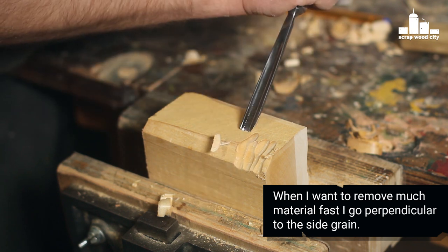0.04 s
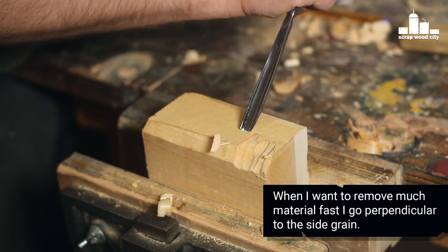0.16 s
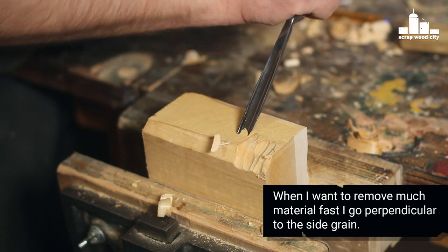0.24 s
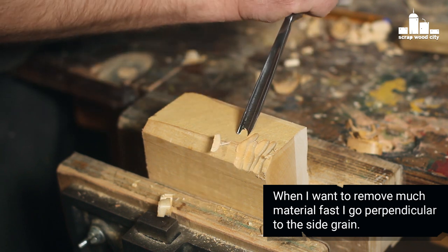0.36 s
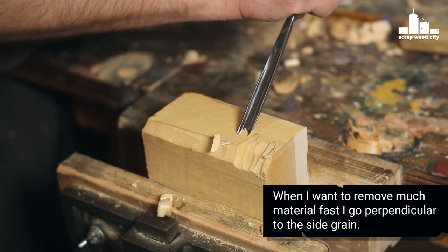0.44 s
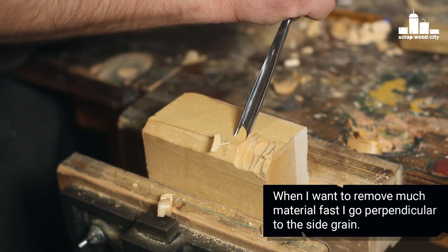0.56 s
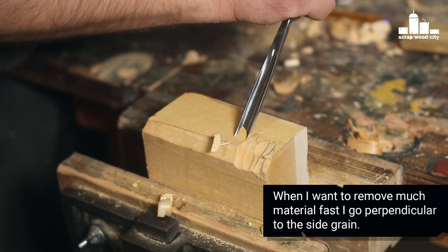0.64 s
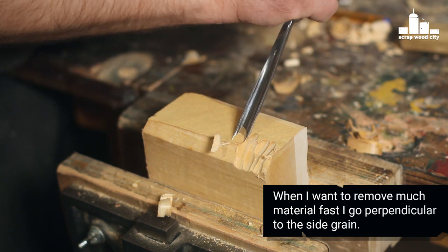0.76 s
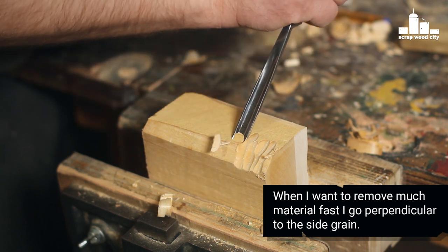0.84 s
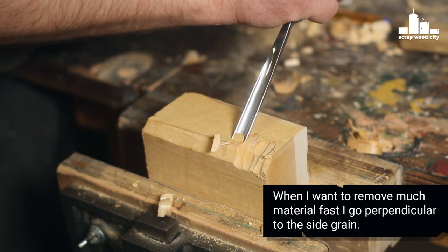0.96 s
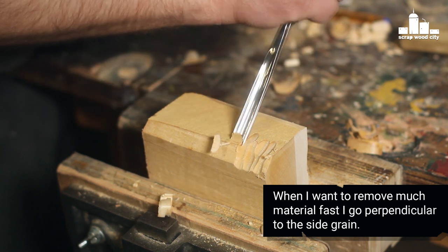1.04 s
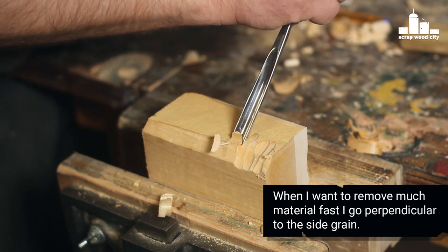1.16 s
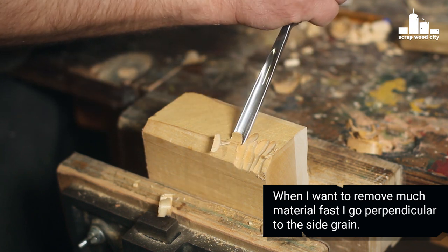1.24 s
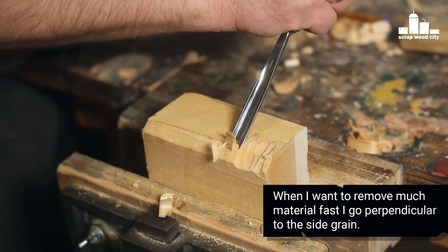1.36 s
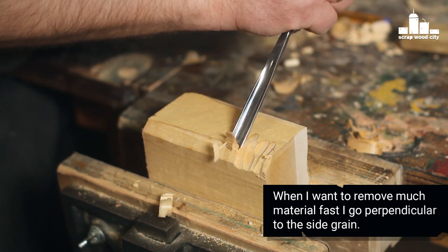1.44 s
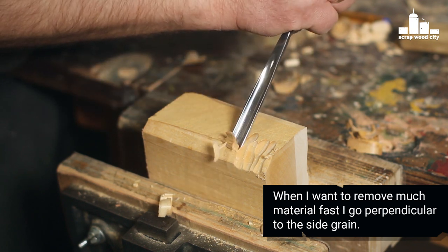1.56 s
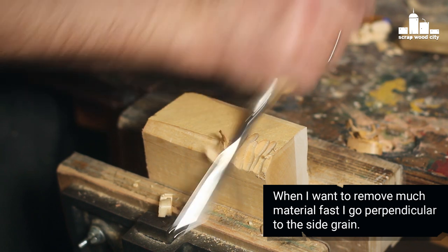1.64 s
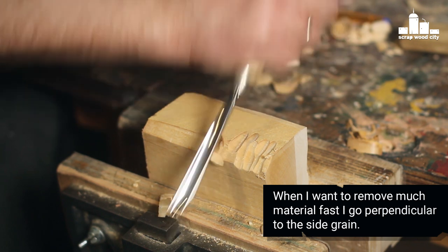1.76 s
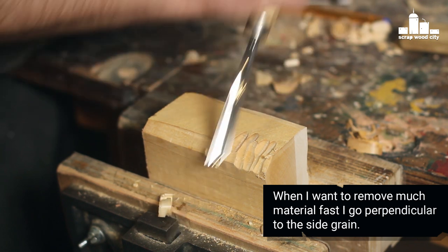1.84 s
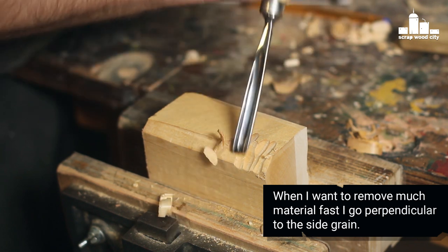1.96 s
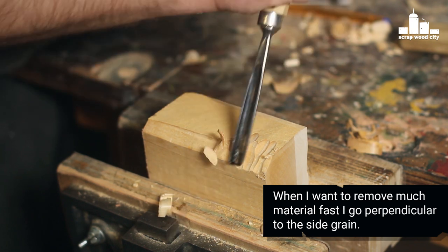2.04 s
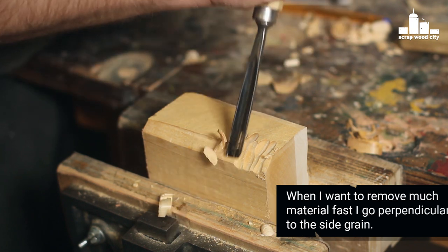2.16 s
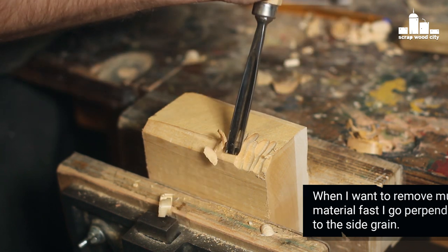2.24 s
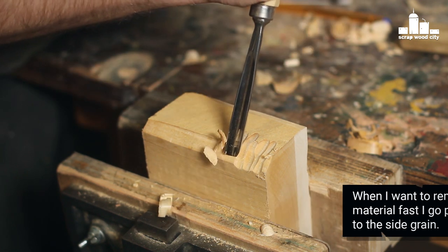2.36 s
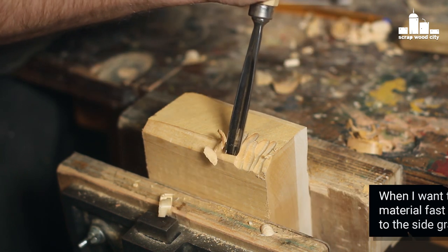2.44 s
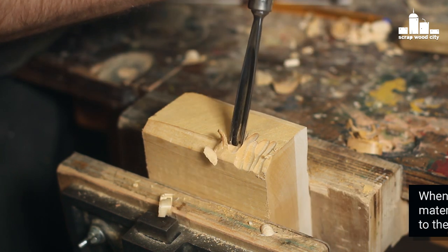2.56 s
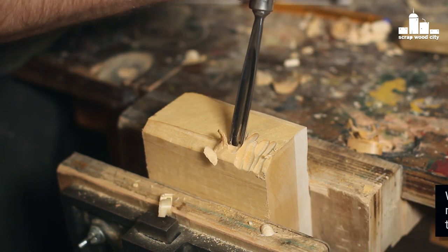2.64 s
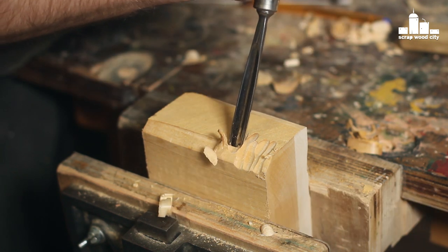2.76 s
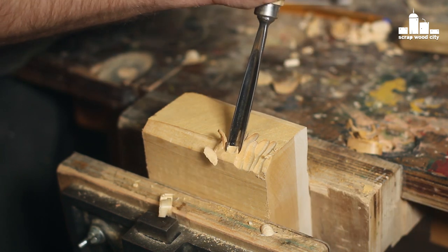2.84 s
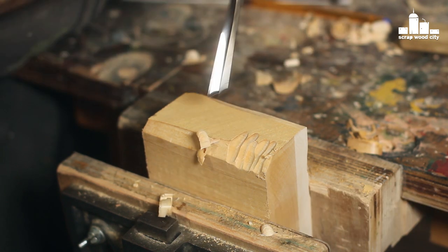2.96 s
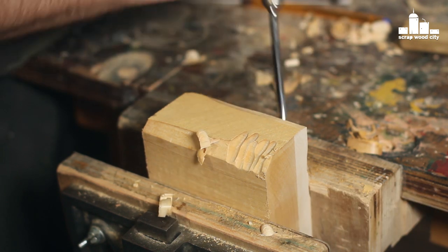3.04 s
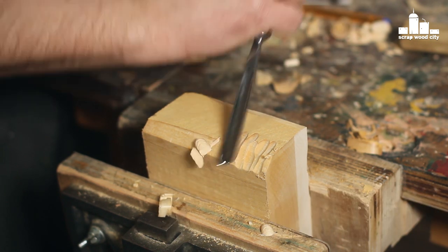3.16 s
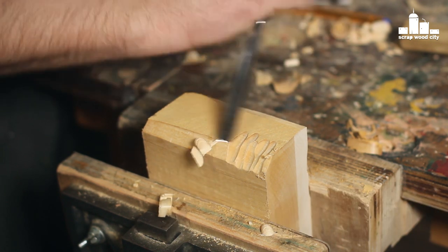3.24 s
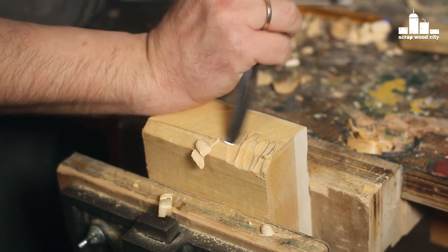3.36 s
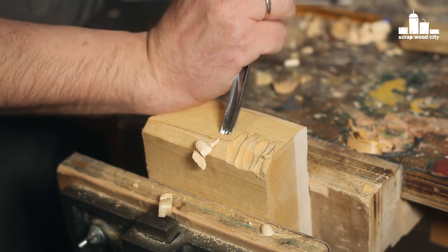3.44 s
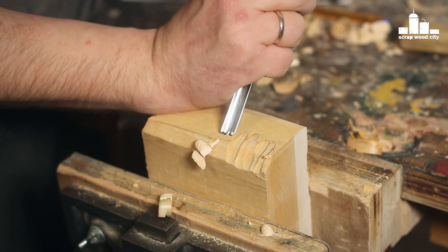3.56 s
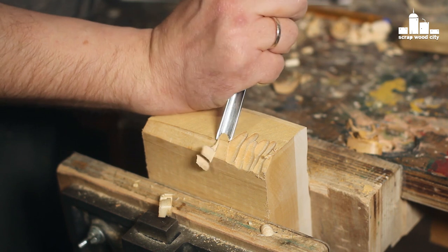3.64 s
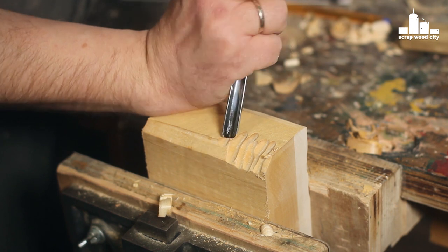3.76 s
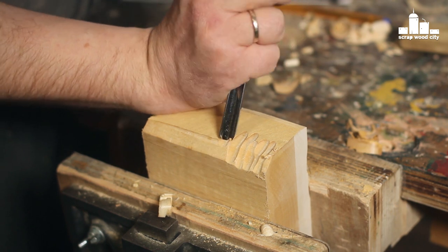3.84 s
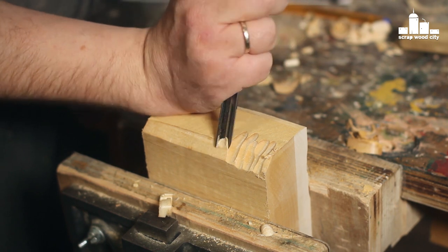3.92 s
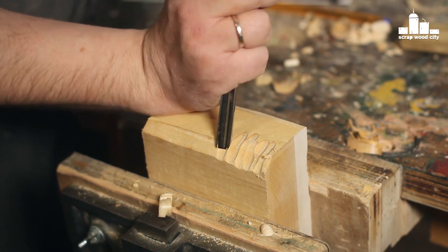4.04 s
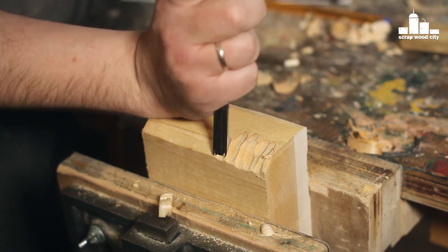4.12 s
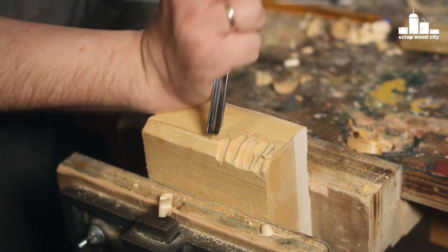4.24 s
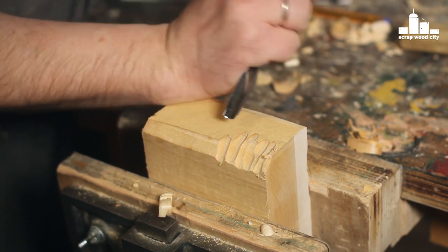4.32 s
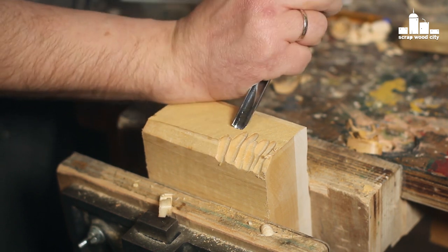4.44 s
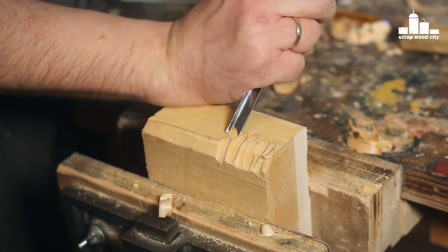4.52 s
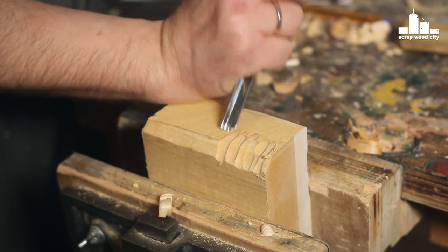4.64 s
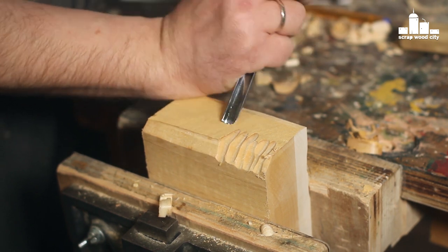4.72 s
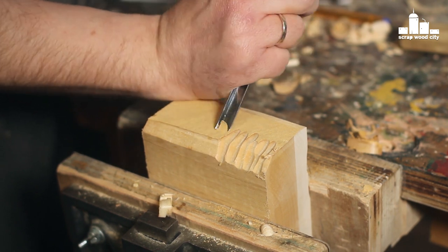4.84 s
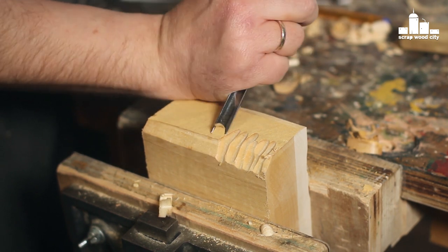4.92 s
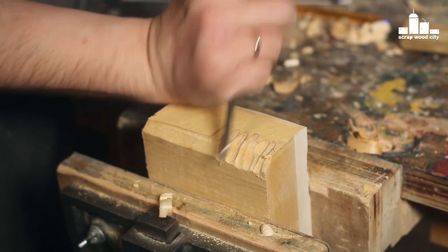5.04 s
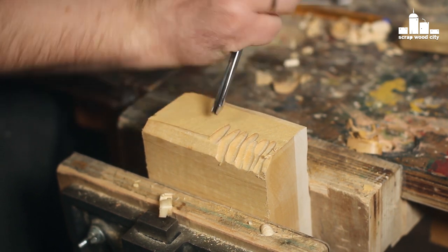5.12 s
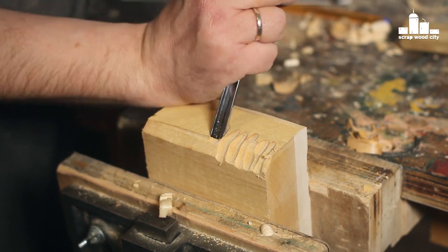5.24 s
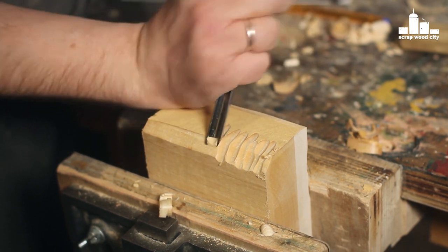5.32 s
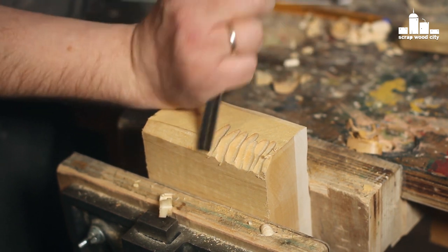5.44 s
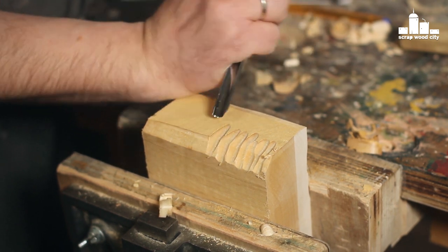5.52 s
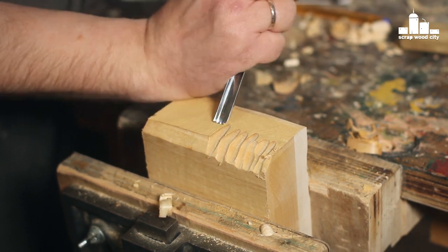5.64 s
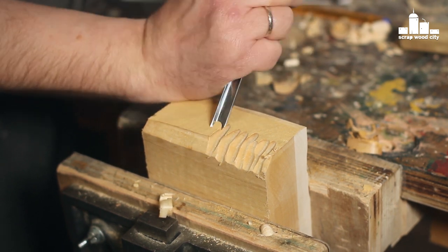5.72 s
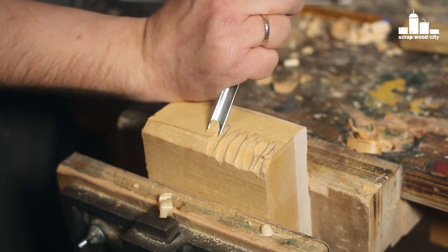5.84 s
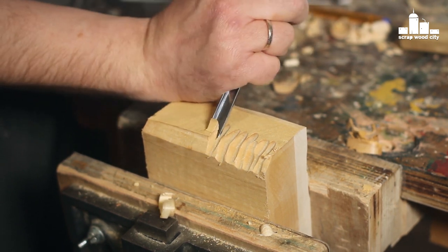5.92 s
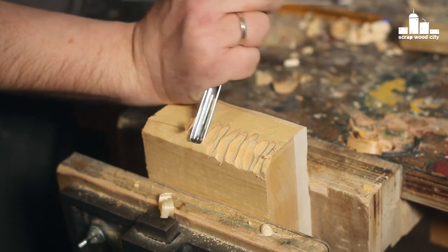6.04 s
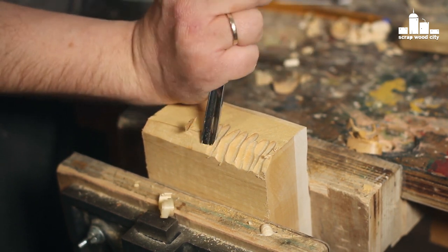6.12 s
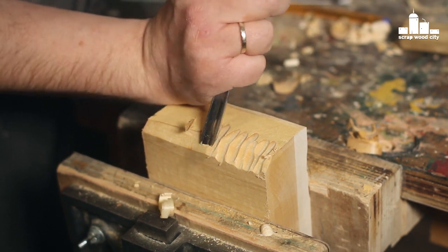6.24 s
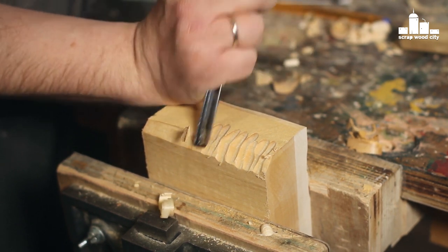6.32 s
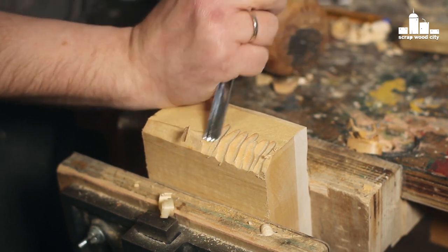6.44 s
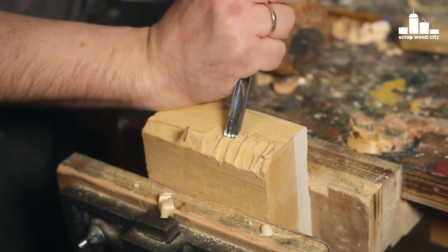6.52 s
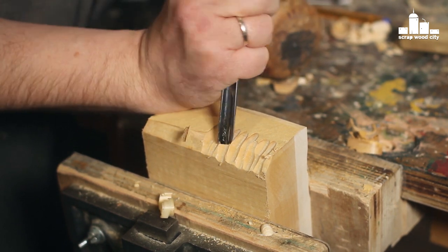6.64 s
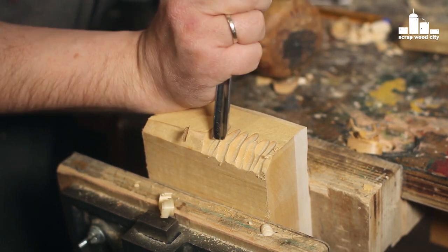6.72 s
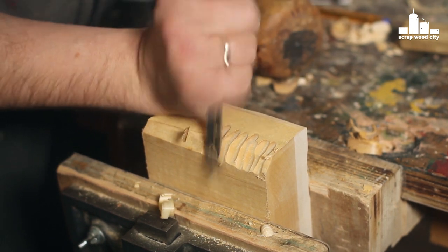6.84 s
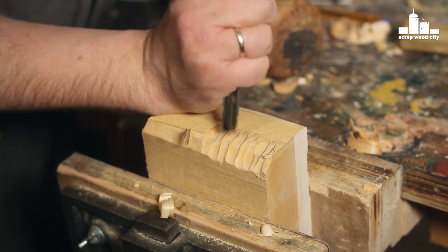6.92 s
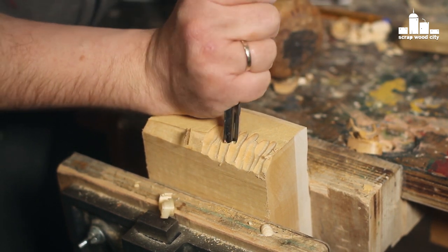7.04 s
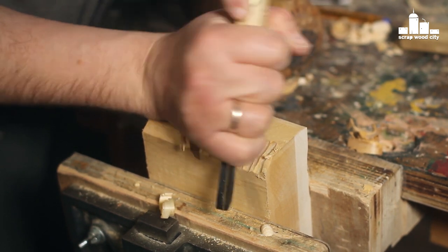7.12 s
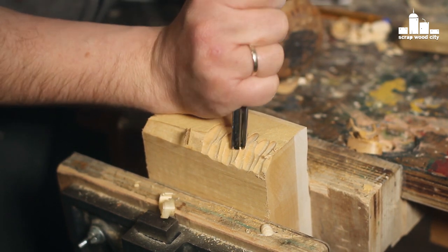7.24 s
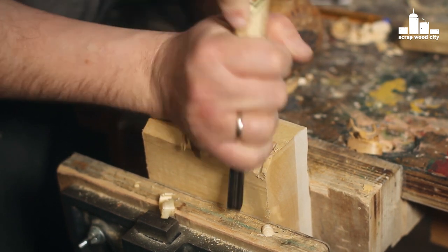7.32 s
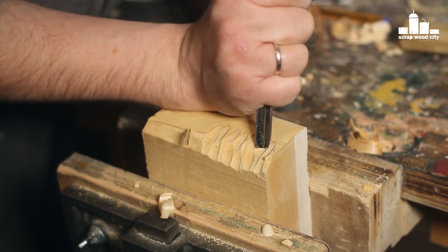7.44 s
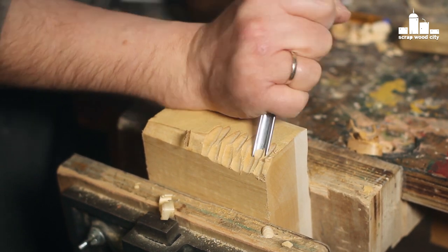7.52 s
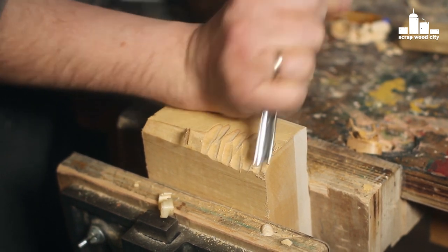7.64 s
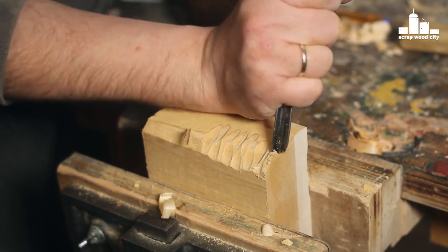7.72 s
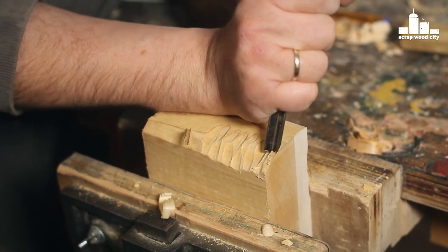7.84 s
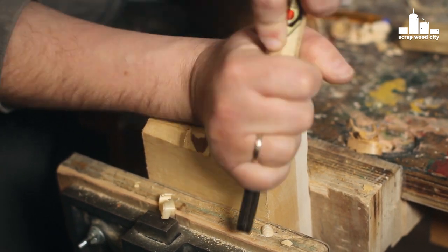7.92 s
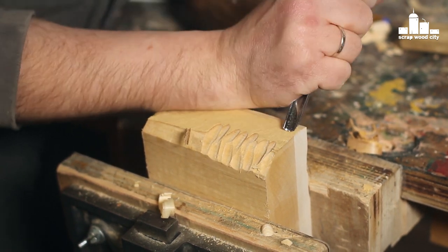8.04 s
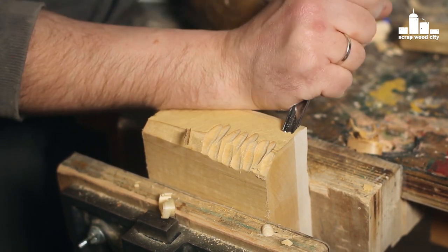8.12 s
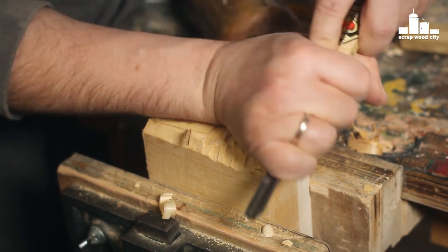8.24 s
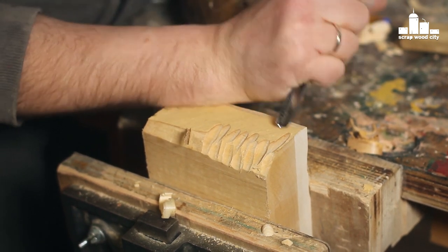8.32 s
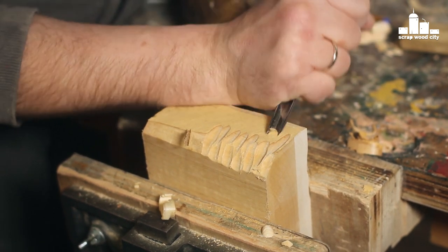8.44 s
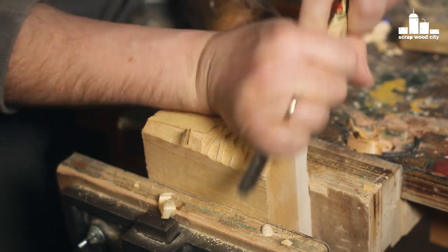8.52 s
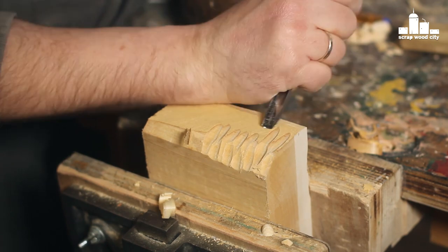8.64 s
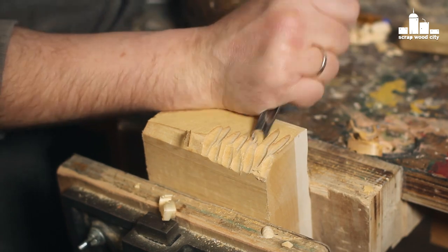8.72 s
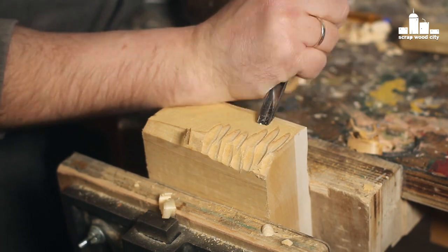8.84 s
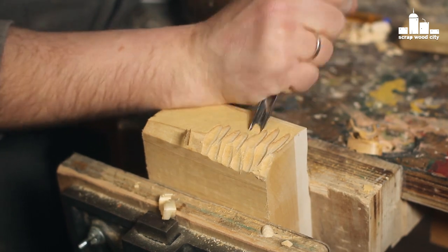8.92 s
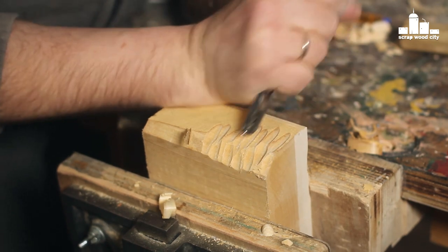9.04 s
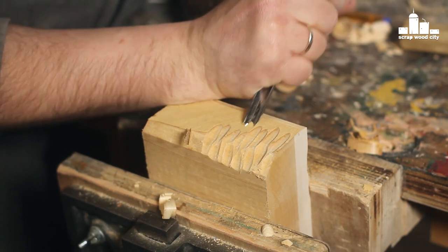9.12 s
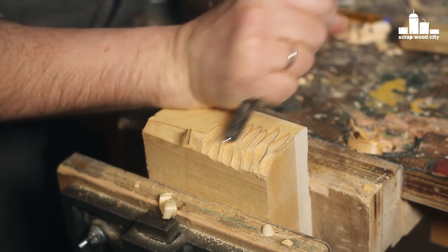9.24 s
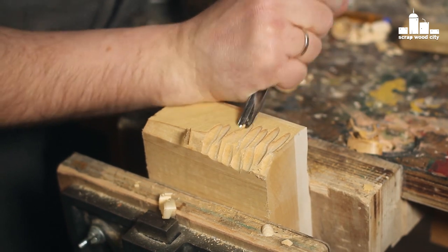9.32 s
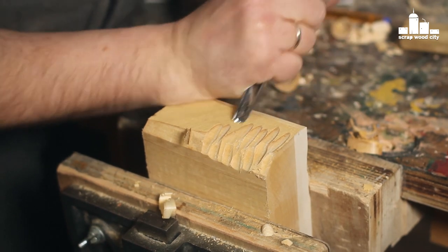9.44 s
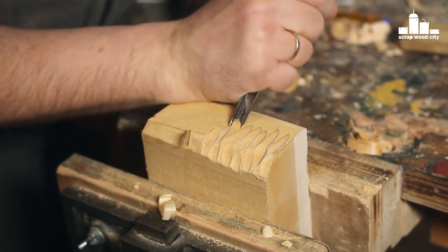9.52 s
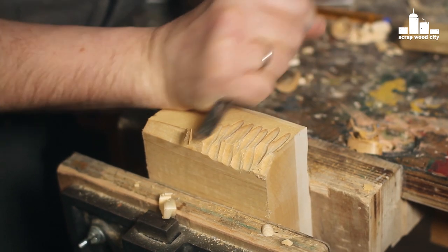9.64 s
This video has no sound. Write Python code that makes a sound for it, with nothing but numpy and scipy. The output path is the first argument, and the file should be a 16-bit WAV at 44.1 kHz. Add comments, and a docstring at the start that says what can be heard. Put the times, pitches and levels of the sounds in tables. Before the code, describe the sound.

Mallet blows knock a gouge into a clamped wood block, then speed up into higher, tighter taps before crunchy hand-pushed cuts with soft thumps.

```python
"""A gouge is driven into a clamped wood block on a bench in a small workshop, over quiet air and a wavering hum.
Mallet blows come first: each is a sharp touch and a rough slip that set bench, block and tool ringing.
A faint squeak of two steady tones comes near 2.5 s. From 2.79 s the work is played back faster, so blows,
bench, room and hum sound higher and ringing dies sooner. Tool bumps and chips are smaller, softer contacts.
From 6.6 s a low rumble joins, then cuts pushed by hand: dense fibre clicks, after which the hand lands."""
import sys
import numpy as np
from scipy import signal
from scipy.fft import rfft, irfft
from scipy.io import wavfile

SR = 44100
rng = np.random.default_rng(int(sys.argv[2]) if len(sys.argv) > 2 else 0)


def gain_from_db(level_db):
    """Convert decibel levels to linear amplitude factors (20 dB per decade)."""
    decades = np.asarray(level_db, float) / 20
    return 10 ** decades


def bounce(signal):
    """Save signal as a 16-bit WAV file at the path given by the first command-line argument."""
    frames = np.transpose(np.atleast_2d(signal))
    limited = np.clip(frames, -1, 1)
    pcm = np.round(limited * 32767).astype(np.int16)
    wavfile.write(sys.argv[1], SR, pcm)


N = 426447

FAST_FROM_S, SPEED = 2.79, 3.566   # from this moment, this many times faster

# spectrum of the quiet room air at normal speed: (frequency [Hz], relative level per Hz [dB])
AIR_SLOW = [(15, -30.5), (25, -14.5), (52, -4.5), (114, -19.5), (193, -6.5), (265, -21.5), (302, -16),
            (497, -22), (567, -17), (613, -17.5), (909, -22), (984, -24), (1060, -24.5), (2280, -26),
            (13200, -42.5)]
# spectrum of the air once sped up, as heard: (frequency [Hz], relative level per Hz [dB])
AIR_FAST = [(15, -41.5), (25, -23), (284, -8), (403, -17), (710, -4.5), (791, -13.5), (1090, -11.5),
            (1280, -14.5), (1680, -17), (1930, -17.5), (3390, -18.5), (4570, -22), (15800, -28)]
AIR_SLOW_DB, AIR_FAST_DB = -61.5, -61
# wavering hum at normal speed: (frequency [Hz], width [Hz], level [dB])
HUM = [(191.5, 1.6, -72), (202, 1.6, -74)]

# mallet on the handle:
# (time [s], force [dB], share reaching the wood [dB], blade brightness [dB], blade ring over force [dB])
BLOWS = [(0.298, -6.5, -18, 2, -1.5), (0.585, -6, -11, 5.5, -38), (0.856, -7, -8.5, 2.5, -40),
         (1.126, -9.5, -4, 6.5, -50), (1.402, -9, -3.5, 3.5, -49), (1.677, -6.5, -14, 2.5, -19),
         (2.872, -9, -14.5, 0.5, -22), (2.951, -8, -11.5, 3, -31), (3.682, -9.5, -14.5, 1.5, -33),
         (3.768, -8, -13.5, -3.5, -17), (3.968, -10, -13, 3.5, -38), (4.043, -9, -15.5, 1.5, -33),
         (4.249, -10, -17.5, 2, -36.5), (4.585, -9, -12.5, -1.5, -24), (4.657, -9, -11, -1, -35),
         (4.892, -7, -12, -1.5, -22), (4.966, -11, -4, 5.5, -36), (5.032, -11, -5, 1.5, -27),
         (5.102, -9.5, -15, -0.5, -25), (5.406, -10, -12, 2.5, -25), (5.479, -10.5, -13.5, 0, -21),
         (5.777, -11, -7.5, 2, -31), (5.843, -9, -8, 1, -28), (5.909, -13.5, -1.5, 3.5, -36.5),
         (5.971, -8.5, -7.5, -3.5, -31), (6.034, -10, -9, -3.5, -34), (6.337, -11, -14.5, 6, -35)]
# chips snap off and drop: (time [s], force [dB], share reaching the wood [dB])
CHIPS = [(2.0953, -55, -22), (3.2246, -42.5, -18), (3.2694, -39.5, -8), (3.3344, -48, -5), (3.5839, -53, 0),
         (3.908, -51.5, -1), (3.94, -48.5, 0), (4.18, -54, -1.5), (4.472, -50.5, 0), (6.6163, -50.5, 3),
         (6.989, -38.5, 3.5), (7.2325, -31.5, -6), (7.2627, -45, 4), (7.4586, -36, -18),
         (7.4774, -44.5, -7), (7.7093, -32, -1), (7.7366, -39, 7.5), (8.078, -38, -14), (8.161, -52, -3),
         (8.357, -36, 5), (8.624, -38, 4), (8.8759, -32, 3), (8.9062, -34.5, -5), (8.9366, -43, 3),
         (9.1086, -45, 1), (9.137, -39, 1), (9.3053, -44.5, 6), (9.3394, -48, 7), (9.53, -49, 4)]
CHIP_BLADE_DB = -4
# the tool bumps the block as it is set in place:
# (time [s], force [dB], share reaching the wood [dB], blade brightness [dB])
BUMPS = [(2.591, -54, 8.5, 7), (2.645, -60.5, 6, 1), (3.109, -25, 0, -11.5), (3.246, -27, -10, -9),
         (3.344, -25, -5, -7), (3.426, -33, -2, -26.5), (5.29, -29.5, -6.5, -10), (6.496, -34, 14.5, -6),
         (6.514, -38.5, 11.5, -7.5)]
# kinds of contact, one row each, slip length at normal speed:
# (slip length [ms], roughness [slip over touch], bench over block [dB], edge over blade [dB])
BLOW_KIND = (1.6, 0.46, -11.5, -5.5)
BUMP_KIND = (14.5, 1.55, -6.5, -1.2)
CHIP_KIND = (0.7, 0.7, -5.5, 37.5)
LANDING_KIND = (9.5, 8.5, 10, -1.2)

# the five parts are bench, block, handle, blade and cutting edge
# borders between their pitch ranges at normal speed: (frequency [Hz])
PART_EDGES_HZ = [120, 440, 1170, 2250, 4600, 16000]
# broad thud of each part between its modes: (relative level [dB])
PART_DULL_DB = [4, 15.3, 9.87, 10.74, 7.6]
# how late a contact reaches each part at normal speed: (delay [ms])
PART_LAG_MS = [6.0, 2, 0.5, 2.5, 4.5]
# modes that ring, at normal speed: (frequency [Hz], base level [dB], time to fall 60 dB [s])
RINGS = [(64.1, -27, 0.38), (148, -15, 0.22), (187, -3.5, 0.12), (233.5, -1.5, 0.22), (319.5, -4.5, 0.056),
         (384, -6, 0.17), (526, -16.5, 0.017), (637, -9.5, 0.044), (645.6, -6.5, 0.06), (790, -6.5, 0.032),
         (870, -11.5, 0.02), (948, -2, 0.018), (1072, -14, 0.011), (1300, -11.5, 0.01), (1427, -5, 0.045),
         (1480, 2.5, 0.0089), (1716, -2.5, 0.0088), (1667, -14.5, 0.012), (2834, -19, 0.02),
         (4000, -19.5, 0.0051), (5000, -14, 0.0088)]
# a faint high mode of the steel, at normal speed: (frequency [Hz], base level [dB], time to fall 60 dB [s])
STEEL_PING = (12200, -53, .25)
MODE_DRIFT_DB = 3.5   # how strongly the modes drift in level
BLADE_HZ, BLADE_T60_S = 3420, .02   # free length of blade, before the speed factor

# workshop echoes, before the speed factor:
# (frequency [Hz], relative level [dB], 60 dB fall of near scatter [s], 60 dB fall of the walls [s])
ROOM = [(104.1, -12.5, 1, 0.81), (253, -2, 0.33, 1), (585, 2.5, 0.2, 0.84), (1620, 0, 0.14, 0.73),
        (3500, -3, 0.12, 0.737), (5000, -3, 0.096, 0.78), (8000, -1, 0.2, 0.327), (13000, -25, 0.098, .3)]
NEAR_DB, WALLS_DB = -28, -42

# a faint two-note squeak: (time [s], frequency [Hz], level [dB], length [s])
SQUEAK = [(2.474, 4170, -68, 0.045), (2.475, 4850, -68, 0.042)]

RUMBLE_FROM_S, RUMBLE_DB = 6.6, -67.5
# range of the low rumble: (lowest frequency [Hz], highest frequency [Hz])
RUMBLE_HZ = (114, 260)

# pushed cuts: (edge bites [s], breaks out [s], level at break-out [dB], swell from bite [dB])
CUTS = [(6.858, 6.942, -55.5, 27), (7.154, 7.185, -53.5, 9.5), (7.334, 7.385, -56, 21.5),
        (7.652, 7.664, -50.5, 14), (7.955, 7.978, -51.5, 13), (8.244, 8.31, -51.5, 10.5),
        (8.514, 8.574, -55, 6.5), (8.802, 8.83, -50.5, 1.5), (9.015, 9.049, -48, 10),
        (9.229, 9.258, -49.5, 7), (9.418, 9.443, -51, 16), (9.605, 9.599, -49, 10.5),
        (9.643, 9.657, -46, 23)]
# light scrapes of the edge between cuts: (start [s], end [s], level at end [dB], swell [dB])
SCRAPES = [(7.1, 7.121, -90, 0.1), (7.447, 7.47, -69, 8), (7.545, 7.623, -67, 5), (8.059, 8.09, -68.5, 8),
           (8.17, 8.185, -83, 6), (8.365, 8.355, -69, 7), (8.596, 8.628, -65, 0.9),
           (9.138, 9.139, -75, 5.9), (9.54, 9.533, -67, 12)]
BITE_DB_PER_S, LETS_GO_DB_PER_S = 911, 898.5   # rise before the bite, fall after break-out
CRUMBS_DB, CRUMBS_DB_PER_S = -17, 194   # loose fibres crumble on, under the break-out level
# blade over handle at break-out, how much less at the bite, blade over handle in the crumbs
HISS_DB, HISS_SWELL_DB, CRUMBS_HISS_DB = 5, 6.5, -14.5

# after a cut the hand lands on the block: (time [s], force [dB], loss at the bounce [dB])
LANDINGS = [(6.944, -45.5, 2.5), (7.192, -40, 12), (7.395, -49, 0.5), (7.666, -38.5, 11),
            (7.986, -41.5, 20), (8.307, -44.5, 15), (8.579, -37.5, 6), (8.668, -56.5, 11), (8.834, -39, 7),
            (9.062, -42.5, 20), (9.264, -38, 12), (9.35, -56, 11), (9.447, -52.5, 17), (9.664, -43, 1)]
BOUNCE_S, LAND_WOOD_DB, LAND_BLADE_DB = .029, 9, -7

CLIP_TOP = .37   # input overload, as a share of full scale before its lopsidedness
MIC_LOW_HZ, CUTOFF_HZ = 35, 16900


def columns(rows):
    """A table as an array of columns."""
    return np.array(rows, float).T


def rms_one(x):
    """Scales a sound to rms 1."""
    return x / np.sqrt(np.mean(x ** 2) + 1e-20)


def wander(per_s):
    """A slow random curve of rms 1, drawn through random points joined by straight lines."""
    knots = rng.standard_normal(int(N / SR * per_s) + 2)
    return rms_one(np.interp(np.arange(N) / SR * per_s, np.arange(len(knots)), knots))


def ring(force, hz, t60):
    """A resonator: a unit click sets a dying sine of starting height 1 ringing."""
    r = gain_from_db(-60 / (t60 * SR))
    w = 2 * np.pi * hz / SR
    return signal.lfilter([0, np.sin(w)], [1, -2 * r * np.cos(w), r * r], force + 1e-18)


def coloured(spectrum):
    """Steady noise shaped to the given spectrum, rms 1."""
    hz, db = columns(spectrum)
    grid = np.maximum(np.fft.rfftfreq(N, 1 / SR), 1)
    gain = gain_from_db(np.interp(np.log(grid), np.log(hz), db, right=-120))
    return rms_one(irfft(rfft(rng.standard_normal(N)) * gain, N))


def air(spectrum, level_db, speed):
    """Room noise, with noise through narrow resonators as a wavering hum."""
    out = gain_from_db(level_db) * coloured(spectrum)
    for hz, width, hum_db in HUM:
        tone = ring(rng.standard_normal(N), hz * speed, 1.8 / (width * speed))
        out += gain_from_db(hum_db) * rms_one(tone)
    return out


def contacts(rows, kind):
    """Force on each of the five parts: a sharp touch, then a short rough slip, briefer at speed."""
    length_ms, rough, bench_db, edge_db = kind
    force = np.zeros((5, N + 6000))
    for s, level_db, wood_db, blade_db, *_ in rows:
        speed = SPEED if s > FAST_FROM_S else 1
        t = np.arange(2000) / SR * speed
        burst = rng.standard_normal((5, 2000)) * np.exp(-t * 1000 / length_ms)
        burst *= rough / np.sqrt(np.sum(burst ** 2, axis=1, keepdims=True))
        burst[:, 0] += 1   # the sharp touch
        shares_db = np.array([[wood_db + bench_db], [wood_db], [0], [blade_db], [blade_db + edge_db]])
        burst *= gain_from_db(level_db + shares_db) / np.hypot(1, rough)
        for part, lag_ms in enumerate(PART_LAG_MS):
            i = round((s + lag_ms / 1000 / speed) * SR)
            force[part, i:i + 2000] += burst[part]
    return force[:, :N]


def blows():
    """The mallet strikes the handle: short slips with a clear sharp touch."""
    return contacts(BLOWS, BLOW_KIND)


def body(force, speed):
    """Each part thuds over its whole range and rings in its modes; what is pushed past hearing drops out."""
    out = np.zeros(N)
    for part, dull_db in enumerate(PART_DULL_DB):
        low, high = np.array(PART_EDGES_HZ[part:part + 2]) * speed
        if high < SR / 2:
            thud = signal.lfilter(*signal.butter(2, [low, high], "band", fs=SR), force[part])
            level = gain_from_db(dull_db) * SR / (high - low) / 10 * np.sqrt(speed)
            out += (-1) ** part * level * thud
    for k, (hz, level_db, t60) in enumerate([*RINGS, STEEL_PING]):
        if hz * speed > CUTOFF_HZ:
            continue
        part = max(np.searchsorted(PART_EDGES_HZ, hz) - 1, 0)
        # each mode's level drifts at random, so hits differ in colour
        drift = gain_from_db(level_db + MODE_DRIFT_DB * np.clip(wander(12), -2.5, 1))
        out += (-1) ** k * ring(drift * force[part], hz * speed, t60 / speed)
    # a low cut keeps the resonators' deep bass out
    return signal.lfilter(*signal.butter(2, 50 * speed, "high", fs=SR), out)


def blade_rings(speed):
    """Each blow rings the free length of blade more or less, as grip and depth allow."""
    s, force_db, *_, ring_db = columns(BLOWS)
    at_this_speed = (s > FAST_FROM_S) == (speed > 1)
    clicks = np.zeros(N)
    clicks[np.round(s * SR).astype(int)] = gain_from_db(force_db + ring_db) * at_this_speed
    return ring(clicks, BLADE_HZ * speed, BLADE_T60_S / speed)


def workshop(x, speed):
    """Echoes: noise in half-octave bands, dying fast off nearby things and slowly off the walls."""
    t = np.arange(int(SR / speed)) / SR * speed
    hz, *table = columns(ROOM)
    echo = 0
    edges = 45 * 2 ** np.arange(0, 8.6, .5) * speed
    for low, high in zip(edges, edges[1:]):
        if high < .49 * SR:
            middle = np.log(low * high) / 2
            level, near, walls = [np.interp(middle, np.log(hz * speed), c) for c in table]
            sos = signal.butter(2, [low, high], "band", fs=SR, output="sos")
            fade = np.hypot(gain_from_db(NEAR_DB - 60 * t / near), gain_from_db(WALLS_DB - 60 * t / walls))
            echo = echo + gain_from_db(level) * fade * signal.sosfilt(sos, rng.standard_normal(len(t)))
    arrival = np.clip(t / 0.002, 0, 1)   # first echoes come off the bench top
    return x + signal.fftconvolve(x, echo * arrival * np.sqrt(speed))[:N]


def chips():
    """Chips snap off and drop: very brief, weak contacts."""
    return contacts([(*row, CHIP_BLADE_DB) for row in CHIPS], CHIP_KIND)


def squeak():
    """Short steady tones that swell and fade."""
    t = np.arange(N) / SR
    out = np.zeros(N)
    for s, hz, db, length in SQUEAK:
        swell = np.sin(np.pi * np.clip((t - s) / length, 0, 1))
        out += gain_from_db(db) * swell * np.sin(2 * np.pi * hz * t)
    return out


def bumps():
    """The tool bumps the block as it is set in place: longer, rougher slips."""
    return contacts(BUMPS, BUMP_KIND)


def rumble():
    """Low noise that fades in and stays."""
    low = signal.lfilter(*signal.butter(2, RUMBLE_HZ, "band", fs=SR), rng.standard_normal(N))
    fade_in = np.clip((np.arange(N) / SR - RUMBLE_FROM_S) / .2, 0, 1)
    return gain_from_db(RUMBLE_DB) * rms_one(low) * fade_in


def strokes():
    """Pressure on wood and blade: quick bite, swell to break-out, quick release, dull crumbs."""
    t, wood, blade = np.arange(N) / SR, np.zeros(N), np.zeros(N)
    for bite_s, out_s, level_db, swell_db in [*CUTS, *SCRAPES]:
        near = slice(int((bite_s - .1) * SR), int((out_s + .3) * SR))
        to_go = np.clip((out_s - t[near]) / max(out_s - bite_s, .001), 0, 1)   # 1 at the bite, 0 at break-out
        early = np.maximum(bite_s - t[near], 0)
        late = np.maximum(t[near] - out_s, 0)
        push = gain_from_db(level_db - swell_db * to_go - BITE_DB_PER_S * early - LETS_GO_DB_PER_S * late)
        crumbs = gain_from_db(level_db + CRUMBS_DB - CRUMBS_DB_PER_S * late) * (late > 0)
        wood[near] += push + crumbs
        blade[near] += push * gain_from_db(HISS_DB - HISS_SWELL_DB * to_go) + crumbs * gain_from_db(CRUMBS_HISS_DB)
    return wood, blade


def cutting(fibres_per_s=5000, spread_db=4.0, bench_db=-14, block_db=-2.0):
    """Fibres part as dense uneven clicks under each stroke."""
    wood, blade = strokes()
    sizes = gain_from_db(spread_db * rng.exponential(1, N)) * rng.choice([-1, 1], N)
    fibres = rms_one(sizes * (rng.random(N) < fibres_per_s / SR))
    return fibres * np.array([wood * gain_from_db(bench_db), wood * gain_from_db(block_db), wood, blade, 0 * wood])


def landings():
    """The hand lands on the block, then touches once more, more weakly."""
    touches = []
    for s, db, loss_db in LANDINGS:
        touches.append((s, db, LAND_WOOD_DB, LAND_BLADE_DB))
        touches.append((s + BOUNCE_S, db - loss_db, LAND_WOOD_DB, LAND_BLADE_DB))
    return contacts(touches, LANDING_KIND)


def scene():
    """All forces sound through bodies and room at normal, then at fast speed; the rumble lies over both."""
    force = blows() + bumps() + landings() + chips() + cutting()
    fast = np.arange(N) > FAST_FROM_S * SR
    slow_work = body(force * ~fast, 1) + blade_rings(0.975) + squeak()
    slow_part = workshop(slow_work, 0.98) + air(AIR_SLOW, AIR_SLOW_DB, 1)
    fast_work = body(force * fast, SPEED) + blade_rings(SPEED)
    fast_part = workshop(fast_work, SPEED) + air(AIR_FAST, AIR_FAST_DB, SPEED)
    return (np.where(fast, fast_part, slow_part) + rumble())[None]


def roll_off(x):
    """The treble ends steeply here."""
    return signal.sosfilt(signal.butter(12, 16900, fs=SR, output="sos"), x)


def record(dry):
    """The hardest blows overload the input, a little lopsidedly, which leaves a low pop; the top is cut."""
    top = CLIP_TOP * gain_from_db(0.97 * np.sign(dry))
    x = dry / (1 + (dry / top) ** 4) ** .25
    x = signal.lfilter(*signal.butter(1, MIC_LOW_HZ, "high", fs=SR), x)
    x = signal.sosfilt(signal.cheby2(12, 60, CUTOFF_HZ, fs=SR, output="sos"), x)
    return roll_off(x)


dry = scene()
out = record(dry)
bounce(out)
```